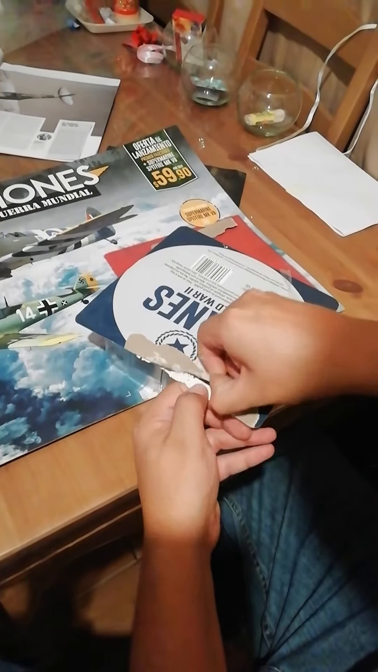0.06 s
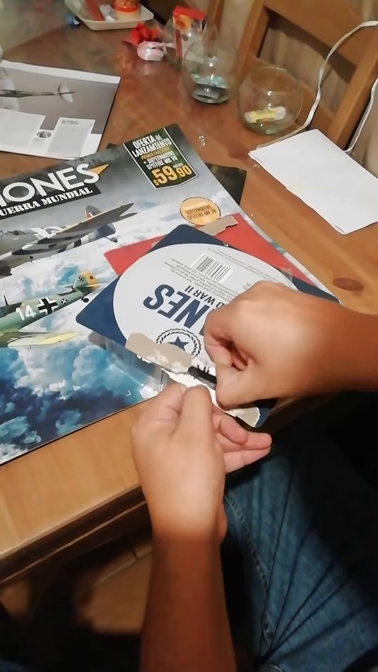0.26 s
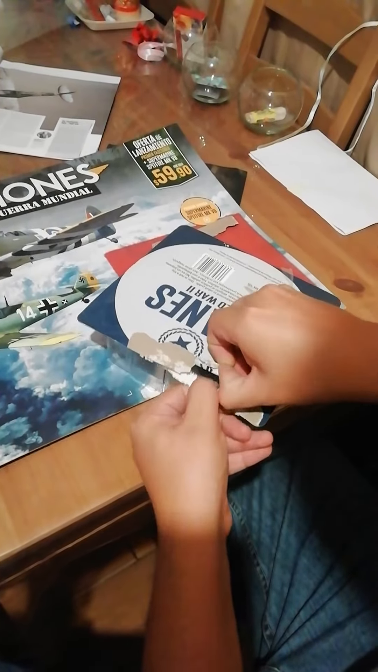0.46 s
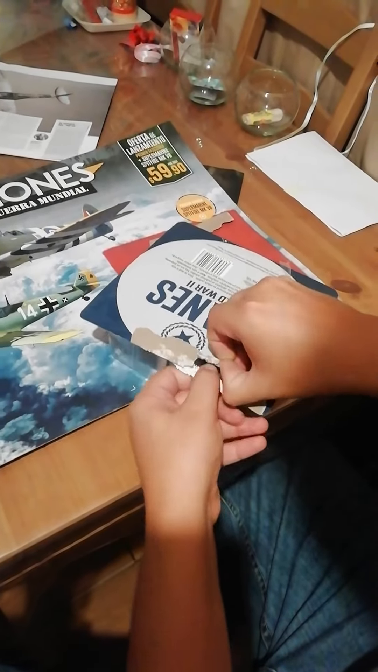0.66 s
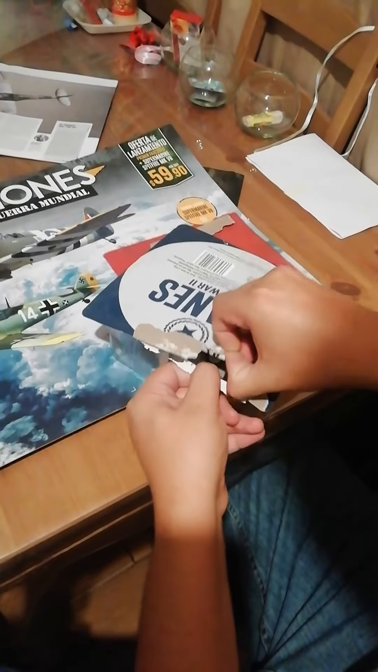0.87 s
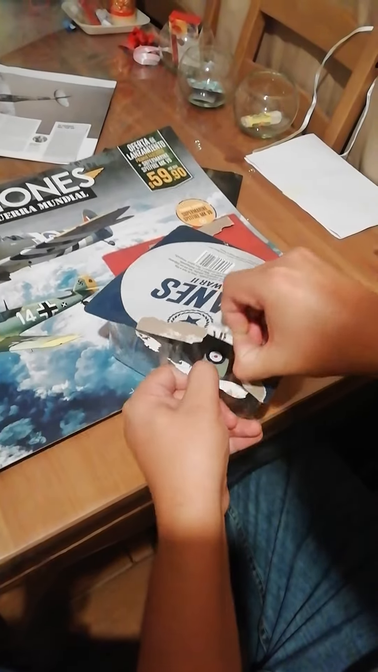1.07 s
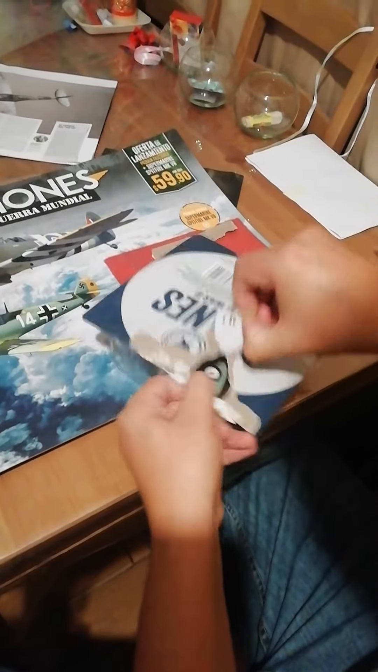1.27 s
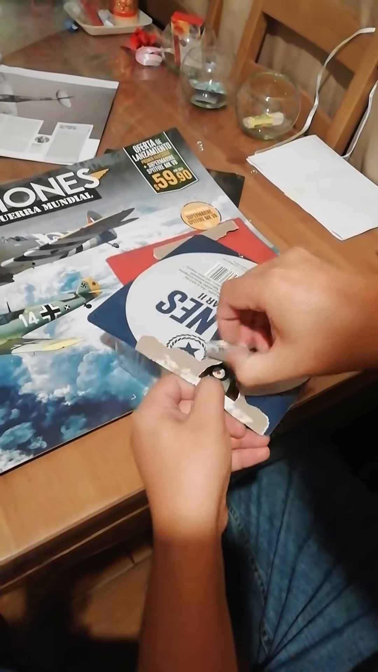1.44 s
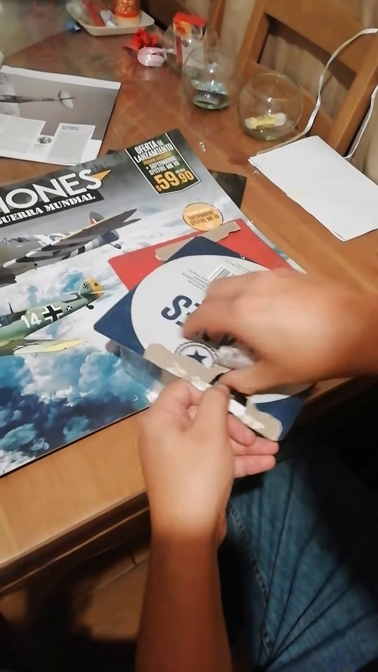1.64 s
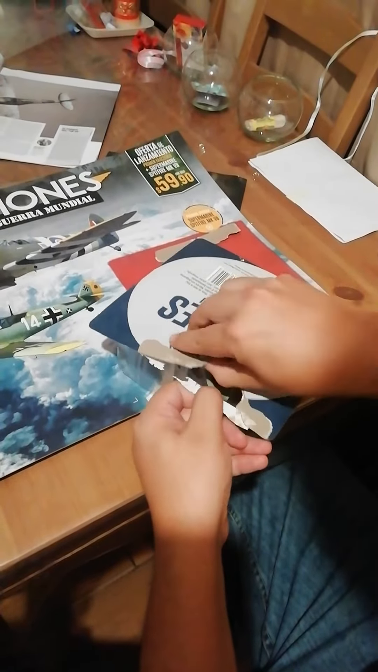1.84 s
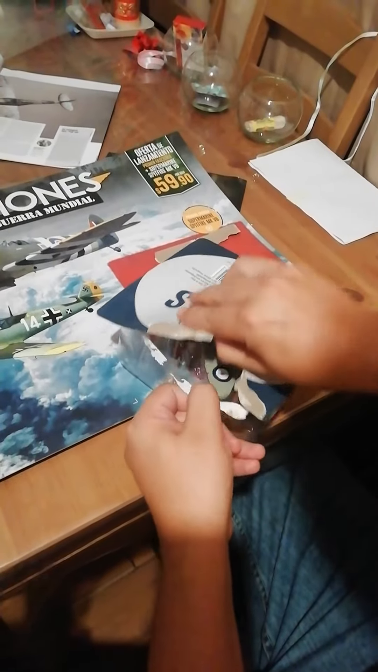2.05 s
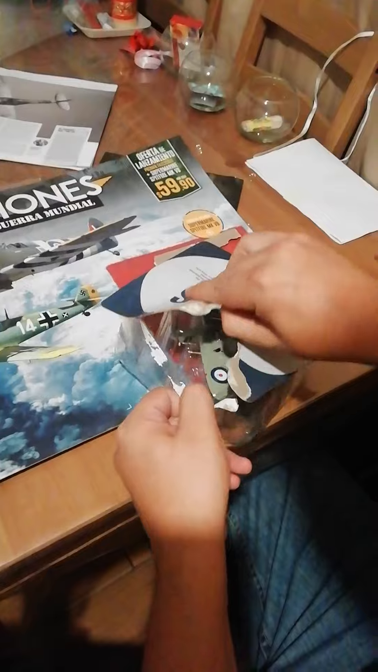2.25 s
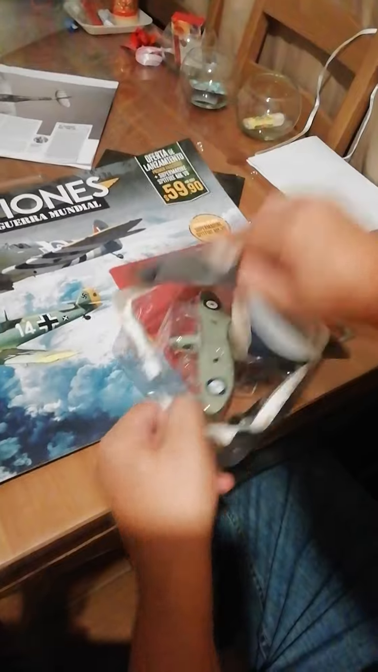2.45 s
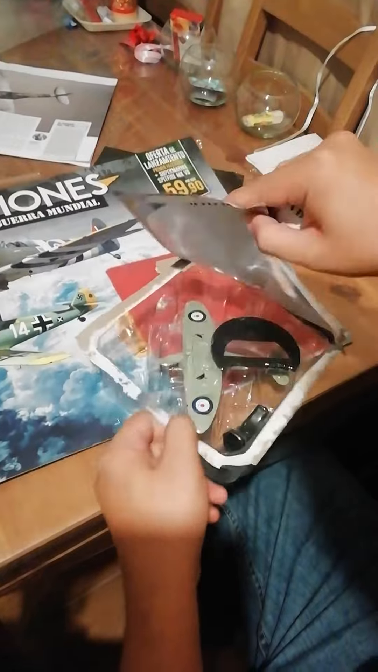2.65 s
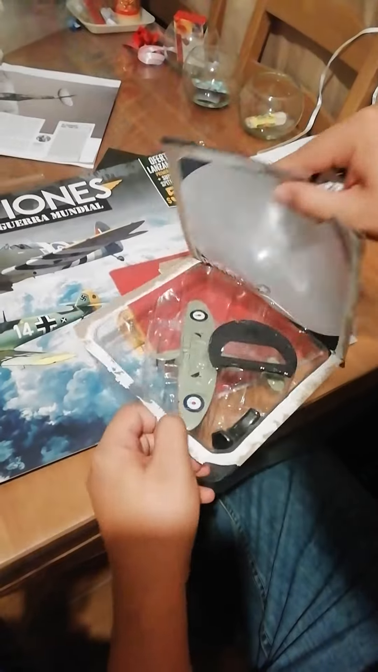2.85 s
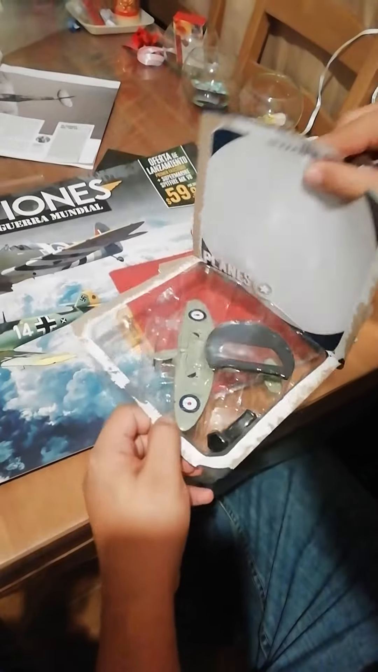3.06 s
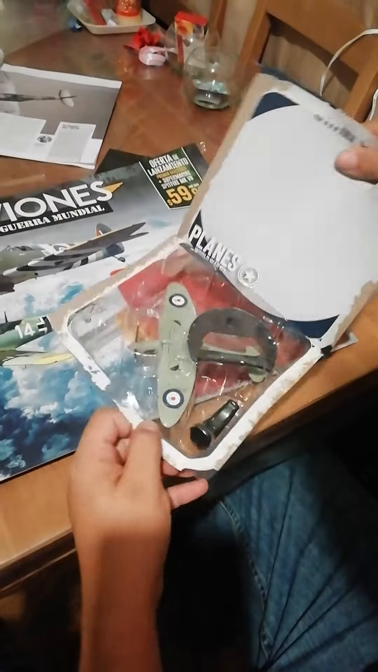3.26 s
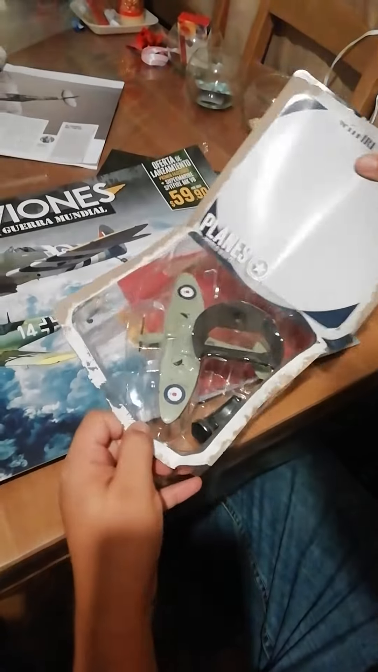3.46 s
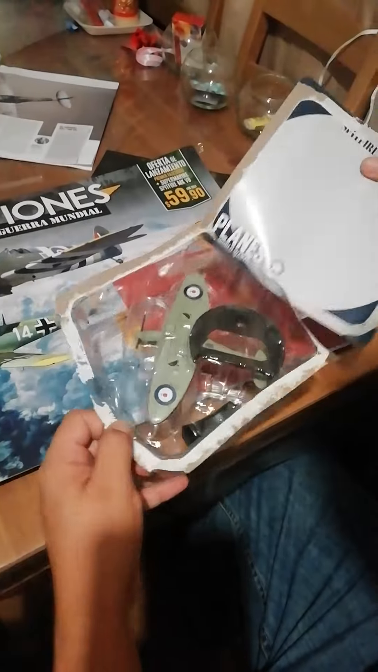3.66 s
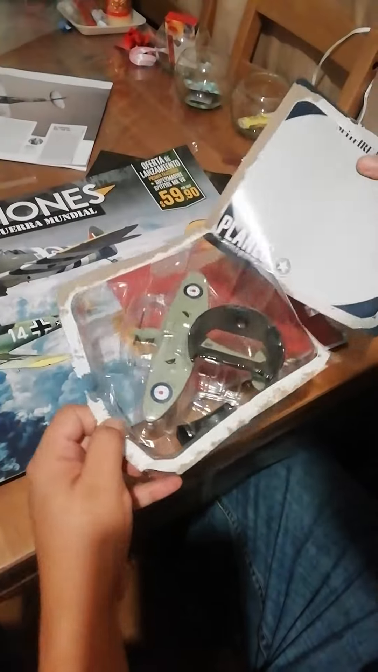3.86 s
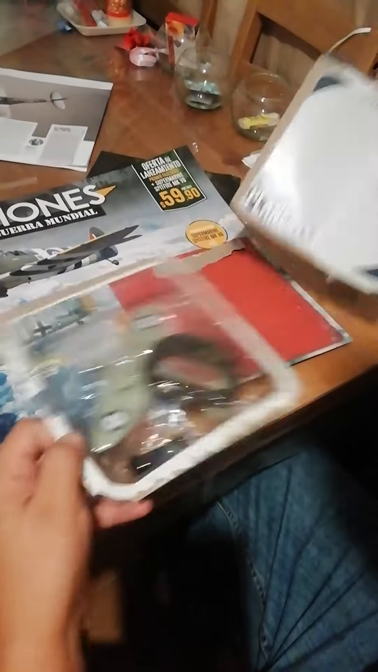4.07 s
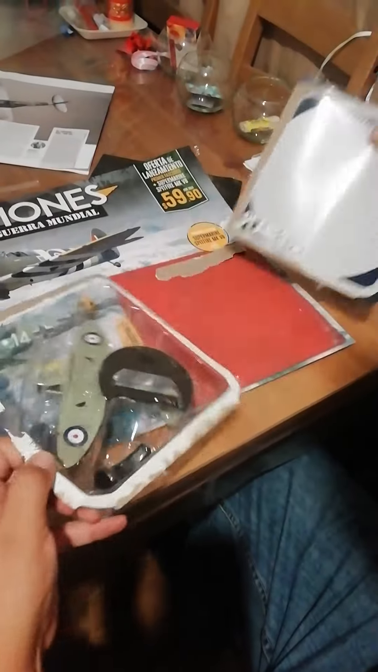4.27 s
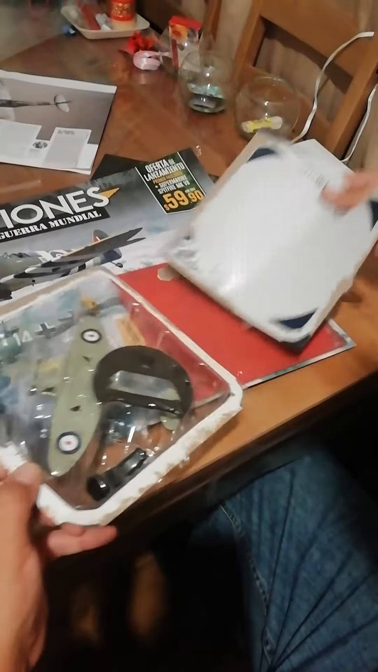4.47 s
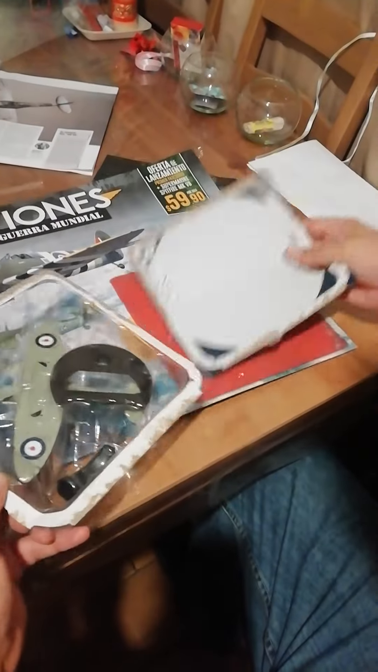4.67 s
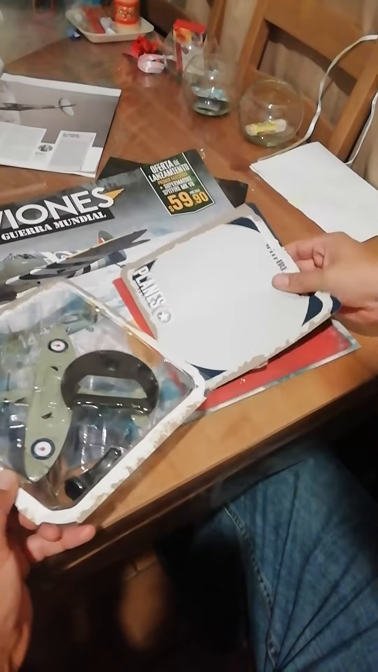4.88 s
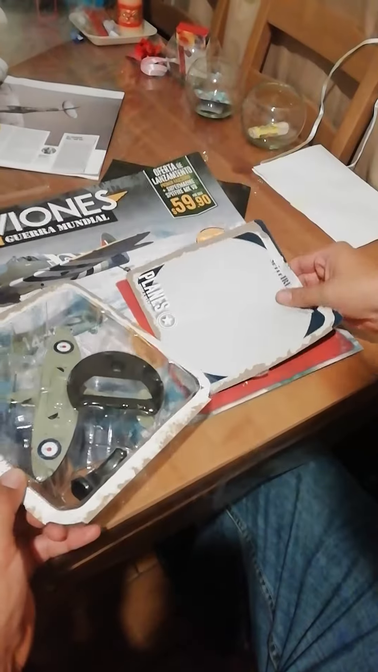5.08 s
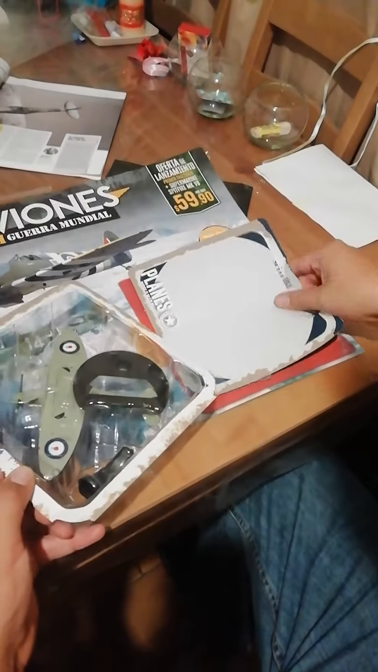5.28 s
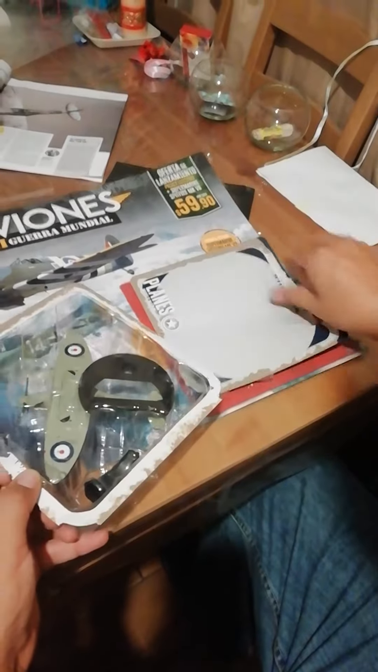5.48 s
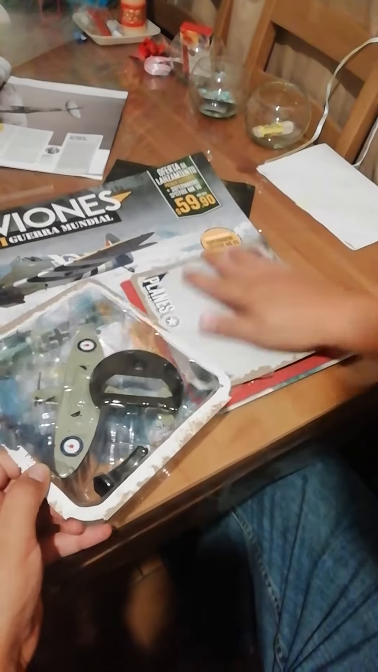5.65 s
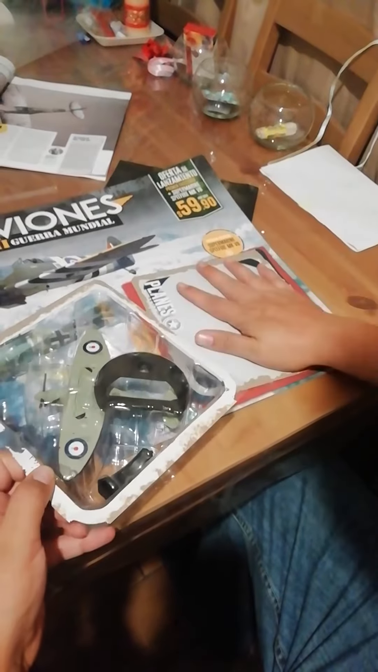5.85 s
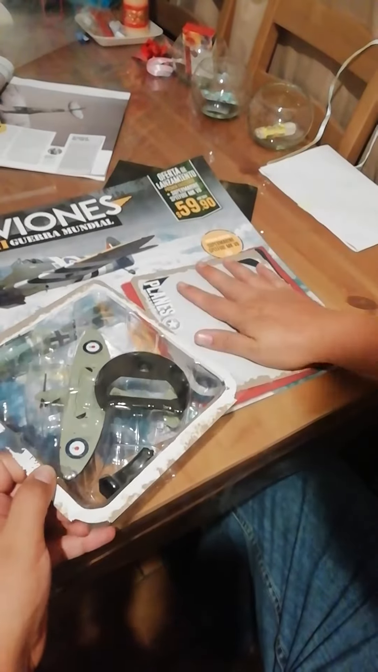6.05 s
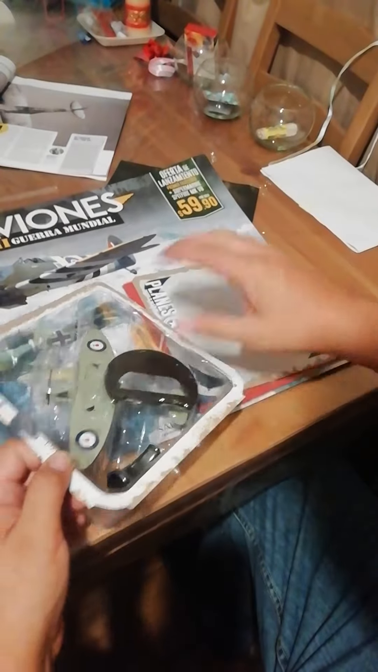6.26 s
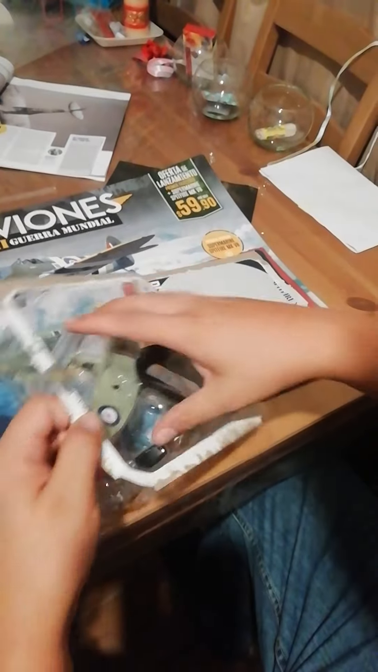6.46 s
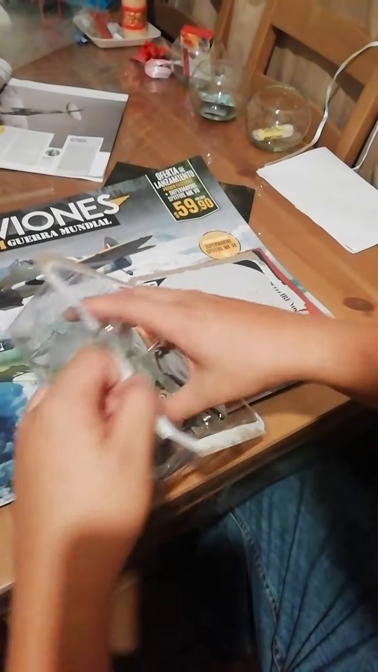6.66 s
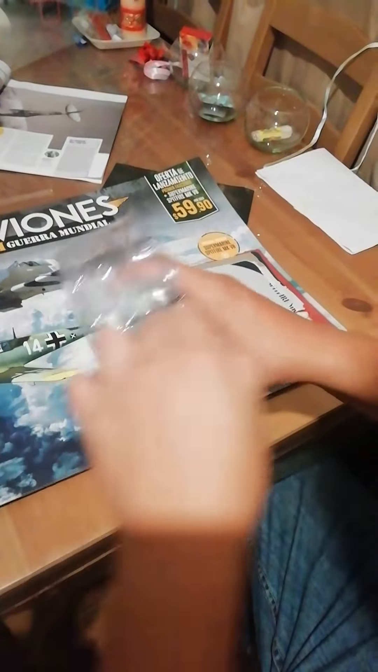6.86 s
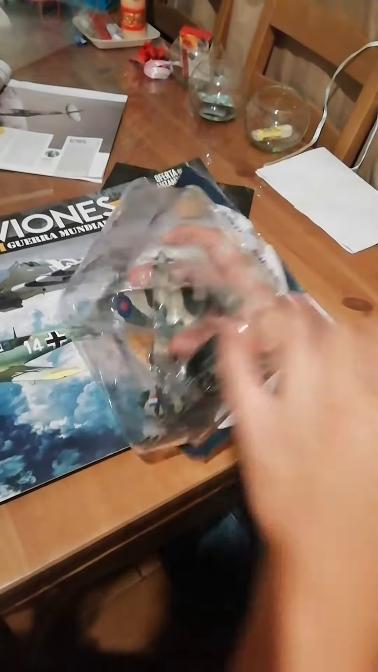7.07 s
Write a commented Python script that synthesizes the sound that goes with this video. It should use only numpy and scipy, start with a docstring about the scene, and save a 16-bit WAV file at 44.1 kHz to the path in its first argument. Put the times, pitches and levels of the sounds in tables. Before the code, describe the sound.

A small furnished room with faint low hum and quiet air, heard through close stereo phone microphones. A tiny finger squeak starts at once, then light plastic snaps from 0.14 s. Ticks stay sparse until a hard crack near 0.97 s, with more at 1.1 to 1.35 s, a short glue rip and low card thumps. A lull with a faint slide follows until 1.9 s. Snaps thicken from 2.0 s; between 2.3 and 2.7 s come strong cracks, gritty tearing and the heaviest card thump. Crackling continues from 2.8 s, growing sharpest and loudest from 3.35 to 4.2 s, with hollow pops and rips. It then drops abruptly: small clicks near 4.5 s, a few at 5.0 to 5.25 s, a clear brushing slide at 5.4 s, clicks around 5.7 s. A brighter snap at 6.17 s leads to light ticks, near quiet, then a small crackle at 6.95 s.

```python
"""Over a low hum, room air and a faint rustle of fingers, a squeak comes at once, then the first snaps of
stiff plastic. Hands pry a blister off its card on a table, lay the card down and turn the blister over.
Buckles are noise bursts through resonances of crack, shell and card; tearing glue and fibres are dense
random clicks. The flexing card thumps in decaying low sines. A small furnished room answers with decaying
noise tails; a phone with two microphones listens from close by."""
import sys
import numpy as np
from scipy import signal
from scipy.fft import rfft, irfft, next_fast_len
from scipy.io import wavfile
from scipy.ndimage import map_coordinates

SR = 44100
rng = np.random.default_rng(int(sys.argv[2]) if len(sys.argv) > 2 else 0)


def file_out(sig):
    """Save sig as 16-bit WAV at sys.argv[1]."""
    # one column per channel
    cols = np.atleast_2d(sig).T
    # limit, then scale
    lim = np.clip(cols, -1, 1)
    pcm = np.round(lim * 32767).astype(np.int16)
    wavfile.write(sys.argv[1], SR, pcm)


N = 313992

# Room tone spectrum: (frequency [Hz], relative density [dB per Hz])
AIR_SPECTRUM = [(12, -20), (20, -3.5), (65, -14.5), (131, -7.5), (164, -8), (243, -8), (360, -22),
                (649, -21.5), (859, -37.5), (935, -48), (1460, -30), (1940, -31.5), (4630, -37),
                (14600, -42), (16400, -85)]
# Partials of the appliance hum: (frequency [Hz], nominal rms level [dB])
HUM_PARTIALS = [(59.2, -56.5), (118.4, -62), (177.6, -71.5), (274.5, -72.5), (355.3, -74.5)]
# Correlation of the two microphones: (frequency [Hz], likeness [-1 to 1])
MICROPHONE_LIKENESS = [(30, 0.91), (60, 0.93), (130, 0.98), (290, 0.74), (600, -0.06), (1400, 0.14),
                       (3000, -0.07)]
# Difference in colour of the microphones: (frequency [Hz], left-right level [dB])
MICROPHONE_COLOUR = [(200, 0), (380, -3), (700, 1), (1300, -1), (2400, -3.5), (4400, -5), (8000, 4.5),
                     (12000, 10)]
# Reverberation of the room: (frequency [Hz], 60 dB decay time [s])
ROOM_DECAY = [(200, .45), (530, .33), (1400, .37), (3700, .34), (9700, .28)]
# The card flexes: (time [s], peak level [dB], frequency [Hz])
CARD_THUMPS = [(0.142, -42.5, 402), (0.927, -34, 279), (0.962, -25, 320), (1.22, -28.5, 115),
               (1.25, -28.5, 105), (1.361, -40, 115), (1.502, -42, 88.8), (1.903, -36.5, 95),
               (1.995, -29.5, 126), (2.16, -34.5, 263), (2.362, -35.5, 172), (2.475, -18.5, 277.5),
               (2.5, -27, 270), (2.526, -21.5, 119), (2.74, -34, 169), (2.968, -30.5, 122),
               (3.144, -29.5, 252), (3.268, -31, 353), (3.662, -30.5, 246), (3.694, -40.5, 320),
               (3.809, -31, 247), (4.056, -38.5, 323), (4.215, -33, 224), (4.279, -40, 126),
               (6.961, -40.5, 188)]
# A fingertip drags on the gloss: (start [s], end [s], level [dB], lower resonance [Hz], upper resonance [Hz])
FINGER_SQUEAKS = [(0.024, 0.145, -56.5, 1810, 4400), (5.457, 5.708, -75, 3920, 4710)]
# Fingers shift on plastic and card: (time [s], rustle level [dB], dull part re rustle [dB])
FINGER_RUSTLE = [(0, -59.5, -2), (.18, -54.5, -0.5), (.32, -80, 1), (.55, -57.5, -6), (.89, -60.5, -0.5),
                 (1.23, -38, 0), (1.55, -72.5, 3), (1.98, -61.5, 4.5), (2.56, -37, 3), (2.81, -49.5, -3.5),
                 (2.99, -68, 3), (3.4, -51.5, -5.5), (4.1, -36.5, -0.5), (4.26, -58, 4), (5.1, -69.5, -6.5),
                 (5.29, -51, -4), (5.45, -66, -3.5), (6.09, -76, 3), (6.31, -79, -2), (6.58, -73, 8.5),
                 (6.84, -70.5, 7), (7.12, -58, -3)]
# One surface slides on another: (middle time [s], length [s], hiss level [dB])
SURFACE_SLIDES = [(.64, 0.064, -62), (1.46, 0.043, -51.5), (1.72, 0.097, -48), (4.42, 0.011, -68),
                  (4.457, .012, -50), (4.67, 0.048, -49.5), (4.92, 0.063, -64), (5.378, 0.083, -37.5),
                  (5.775, 0.051, -45), (5.96, 0.016, -60.5), (6.13, 0.14, -63), (6.575, 0.055, -69.5),
                  (6.93, 0.065, -53)]
# Glue lets go: (middle time [s], length [s], crackle level [dB])
GLUE_RIPS = [(0.162, 0.042, -44.5), (0.96, 0.02, -38.5), (1.116, 0.011, -42), (1.201, 0.029, -26),
             (1.252, 0.04, -66), (2.131, 0.024, -27.5), (2.42, 0.026, -28), (2.498, 0.09, -20),
             (2.562, 0.084, -23.5), (3.708, 0.022, -22), (3.848, 0.044, -32.5), (3.992, 0.057, -33.5),
             (4.038, 0.12, -24.5), (6.233, 0.063, -47), (6.998, 0.11, -45.5)]
# Bright colour of tearing fibres: (frequency [Hz], gain [dB])
FIBRE_SPECTRUM = [(880, -30.5), (1500, 0.5), (1960, -6.5), (3140, 0.5), (7810, -4), (9540, -13),
                  (11000, -23.5), (15300, -29.5), (16400, -75)]
# Dull colour of tearing and rubbing: (frequency [Hz], gain [dB])
DULL_SPECTRUM = [(90, -33), (230, -6.5), (500, 0), (900, 2), (1500, 0), (2500, -16), (4500, -42)]
# Buckles: (time [s], crack level [dB], shell level re crack [dB], shell resonance [Hz], crack resonance [Hz])
BUCKLES = [(0.1416, -24.5, -17, 1760, 5220), (0.1595, -24, -10.5, 707, 4370),
           (0.2764, -28.5, -6.5, 1080, 3680), (0.332, -46, 2.5, 900, 4870), (0.5013, -37, -7, 1070, 5130),
           (0.5853, -34.5, 4, 1214, 2930), (0.7405, -37.5, -9.5, 1420, 5320),
           (0.8471, -31.5, -21, 1120, 5320), (0.8814, -26, -21, 1460, 3710), (0.9193, -36.5, -1, 680, 3100),
           (0.9671, -5.5, -7.5, 1250, 3960), (1.1215, -17, -11, 1650, 3450),
           (1.1625, -13.5, -6.5, 1780, 5000), (1.223, -7.5, -9.5, 864, 3030),
           (1.3449, -16.5, -9.5, 1256, 4430), (1.501, -36, -17, 1450, 4110), (1.6627, -40, -11, 937, 4170),
           (1.9377, -33.5, -1, 1620, 2710), (1.9725, -25.5, -5.5, 1670, 4080),
           (1.9991, -28, -8.5, 1220, 3460), (2.0729, -17.5, -4.5, 2360, 4070), (2.0984, -20, 9, 1266, 2880),
           (2.1229, -18, -8.5, 1650, 2760), (2.1296, -28, -15, 1520, 4160),
           (2.2002, -25.5, -10, 1340, 4310), (2.2337, -25.5, -19, 1240, 3370),
           (2.2781, -26, 4.5, 1570, 2800), (2.3286, -9, -9.5, 1630, 5070),
           (2.3875, -11.5, -7.5, 1607, 3050), (2.4244, -24.5, -23, 1470, 5590),
           (2.4704, -16.5, -21, 1250, 4390), (2.5093, -22, -21.5, 1600, 3180),
           (2.5682, -8.5, 1, 1360, 2530), (2.6678, -5, -8, 1464, 4020), (2.7964, -47.5, -31, 1240, 4010),
           (2.8225, -23, -8.5, 2110, 3930), (2.9169, -14, -16, 2190, 5380), (2.9297, -17, 0, 1375, 4360),
           (2.9741, -15.5, -2.5, 1234, 3900), (2.9827, -26, 8.5, 808, 4060), (3.1489, -45, 10.5, 790, 3790),
           (3.1943, -16.5, 0, 900, 2870), (3.255, -25, 3, 1160, 3110), (3.2773, -17, 1.5, 1293, 2540),
           (3.3635, -10.5, 0, 843, 3920), (3.3809, -7, -5, 998, 4580), (3.466, -11, -8.5, 2100, 4490),
           (3.473, -1, -8.5, 885, 4270), (3.6359, -19, -5, 1720, 4010), (3.664, -8, -7, 2315, 4220),
           (3.6672, -5.5, -1.5, 1810, 3110), (3.7002, -16, 5.5, 785, 4550), (3.8105, -18.5, 0.5, 730, 5490),
           (3.8135, -2, -6, 787, 5700), (3.9744, -19, -12.5, 875, 5400), (3.9993, -2.5, -5.5, 1850, 3640),
           (4.0663, -13, -0.5, 1080, 2790), (4.0735, -15.5, -29.5, 2060, 2820),
           (4.1623, -8, 1.5, 1454, 2980), (4.1688, -1.5, -13.5, 2464, 3980),
           (4.4908, -31, -10.5, 1100, 4130), (4.5045, -22, -6.5, 1090, 4410),
           (4.6126, -30.5, -3.5, 2100, 2680), (5.0295, -38, -0.5, 2390, 2800),
           (5.1244, -20, -13.5, 1490, 4880), (5.1728, -20.5, -3.5, 1740, 3420),
           (5.2288, -16, -12, 1600, 5650), (5.7085, -21, -11.5, 1424, 4070),
           (5.7493, -31.5, -6, 1586, 2680), (6.1738, -14.5, -12, 1400, 5300),
           (6.25, -31.5, -11, 1510, 4700), (6.3047, -23.5, -1.5, 1486, 2780), (6.331, -21, -9, 1550, 4340),
           (6.3418, -25, -3.5, 1640, 5640), (6.559, -49.5, 12, 920, 3360), (6.6047, -44.5, 9, 790, 2730),
           (6.662, -48, -1, 1410, 4020), (6.765, -34, -5, 1456, 2680), (6.9424, -33.5, 9, 2280, 3230),
           (6.9527, -18.5, -0.5, 1410, 4170)]
# Colour of the crack: (frequency [Hz], gain [dB])
CRACK_SPECTRUM = [(1400, -52), (2500, -6.5), (3400, -5.5), (4500, -5.5), (6000, -10), (9000, -32.5),
                  (16400, -107)]
# Colour of the sizzle: (frequency [Hz], gain [dB])
SIZZLE_SPECTRUM = [(3000, -31.5), (6000, 4), (7500, 2), (9000, -5), (10500, -17), (14800, -40.5),
                   (16400, -60)]
# Sizzle of the buckles: (time [s], level re crack [dB])
SIZZLE_LEVEL = [(0, -8), (.9, -3.5), (1.6, -10), (2.6, -6.5), (3.4, -6), (4.2, -4.5), (4.6, -4.5),
                (5.7, -5), (7.12, -7.5)]
# Knock of the card under the buckles: (time [s], level [dB])
CARD_KNOCK = [(0, -22.5), (1.2, -16.5), (2, -15.5), (3, -23.5), (3.7, -27), (4.2, -22.5), (4.6, -34),
              (7.12, -35)]
# Where the snaps come from: (time [s], left-right level [dB])
SNAP_PLACE = [(0, -3.5), (1.5, -3), (2.9, -2.5), (3.6, 3), (4.3, 1), (5.1, -1.5), (6.198, 0), (7.12, -2.5)]

TOP_HZ = 16450
THUMP_T60_S = 0.14
RIP_DULL_DB, SLIDE_DULL_DB = -4, -18.5  # dull part re bright part
SIZZLE_FADES = 0.35  # dB lost for each dB of shell re crack: dull snaps sizzle less
CARD_FOLLOWS = 0.55  # dB that the knock gains for each dB of shell level
POP_DB = -6.5  # re shell
SCATTER_DB = 3.5  # standard deviation of sizzle and knock
CRACK_FLOOR = 0.6  # high-pass edge as a share of the crack resonance


def amp(db):
    """Decibel law: the amplitude gain of a level in dB."""
    return 10 ** (np.asarray(db) / 20)


def unit(x):
    """Normalisation of power: x at rms 1."""
    return x / np.sqrt(np.mean(x ** 2) + 1e-20)


def peaked(x, db):
    """Normalisation of amplitude: x with its peak at db."""
    return x * amp(db) / (np.abs(x).max() + 1e-12)


def along(points, hz):
    """Interpolation of (Hz, value) points on a logarithmic frequency axis."""
    f, v = np.transpose(points)
    return np.interp(np.log(hz + 1), np.log(f + 1), v)


def over_time(points, t):
    """Linear interpolation of (s, value) points."""
    return np.interp(t, *np.transpose(points))


def wobble(rate):
    """Slow random modulation: a smooth curve with rate knots a second."""
    knots = rng.standard_normal(int(N * rate / SR) + 4)
    return map_coordinates(knots, [np.arange(N) * rate / SR])


def filtered(x, response):
    """Linear filtering: the spectrum of x times a response of frequency."""
    m = next_fast_len(x.shape[-1] + 8192)
    return irfft(rfft(x, m) * response(np.fft.rfftfreq(m, 1 / SR)), m)[..., :x.shape[-1]]


def coloured(x, spectrum):
    """Minimum-phase filtering: folding the cepstrum makes the (Hz, dB) gain causal."""
    size = 2048
    cepstrum = irfft(np.log(amp(along(spectrum, np.fft.rfftfreq(size, 1 / SR))) + 1e-6))
    cepstrum[1:size // 2] *= 2
    cepstrum[size // 2 + 1:] = 0
    taps = irfft(np.exp(rfft(cepstrum)))[:size // 4]
    return signal.fftconvolve(np.atleast_2d(x), taps[None], axes=1)[:, :x.shape[-1]].reshape(x.shape)


def microphones(pair):
    """Spatial coherence: mixing two unrelated signals makes left and right alike in the bass only."""
    def turn(hz):
        return np.arccos(np.clip(along(MICROPHONE_LIKENESS, hz), -1, 1)) / 2
    mid, side = filtered(pair, lambda hz: np.array([np.cos(turn(hz)), np.sin(turn(hz))]))
    return np.array([mid + side, mid - side])


def appliance():
    """Periodic vibration over diffuse noise: motor partials waver in level and phase above the room tone."""
    t = np.arange(N) / SR
    hum = np.zeros(N)
    for hz, db in HUM_PARTIALS:
        level = np.sqrt(2) * amp(db + 2.2 * wobble(6.5))
        hum += level * np.sin(2 * np.pi * hz * t + 0.12 * wobble(4.6))
    air = filtered(rng.standard_normal((2, N)), lambda hz: amp(along(AIR_SPECTRUM, hz)))
    return hum + amp(-60.5 + 1.1 * wobble(6.6)) * unit(microphones(air))


def room(sources):
    """Reverberation: noise tails die exponentially at a rate set by frequency, one for each source signal."""
    hz, t, z = signal.stft(rng.standard_normal((len(sources), 2, SR // 2)), SR, nperseg=256)
    decay = amp(-60 * t / along(ROOM_DECAY, hz)[:, None])
    tails = signal.istft(z * decay, SR, nperseg=256)[1]
    wet = 0
    for x, tail in zip(sources, tails):
        wet = wet + signal.fftconvolve(x[None], microphones(tail / np.linalg.norm(tail[0])), axes=1)
    return np.pad(wet, ((0, 0), (200, 0)))[:, :N]  # samples of delay to the first walls


def thumps():
    """Damped plate flexure: the card pushes air in short, uneven low swings, equal at both microphones."""
    out, t = np.zeros(N + SR), np.arange(SR // 3) / SR
    envelope = amp(-60 * t / THUMP_T60_S) * (1 - np.exp(-t / 0.0016))
    for s, db, hz in CARD_THUMPS:
        band = signal.butter(1, [hz * .7, hz * 1.3], "band", fs=SR, output="sos")
        unevenness = unit(signal.sosfilt(band, rng.standard_normal(len(t))))
        swing = np.sin(2 * np.pi * hz * t) + 0.71 * unevenness
        out[round(s * SR):][:len(t)] += peaked(swing * envelope, db)
    return out[:N]


def squeaks():
    """Stick-slip friction: unevenly modulated noise through two resonances."""
    t, out = np.arange(N) / SR, 0
    for start, end, db, low_hz, high_hz in FINGER_SQUEAKS:
        gate = np.clip(np.minimum(t - start, end - t) / 0.003, 0, 1)
        stroke = gate * amp(3.5 * wobble(67))

        def bands(f):
            return sum(low_hz / hz / (1 + ((f / hz - 1) / 0.06) ** 2) for hz in (low_hz, high_hz))
        out = out + amp(db) * stroke * unit(filtered(rng.standard_normal((2, N)), bands))
    return out


def strokes(rows, dull_db):
    """Amplitude envelope: each stroke swells and fades once; returns gains of bright and dull parts."""
    swell = np.zeros(N + SR)
    for s, length, db in rows:
        shape = np.sin(np.linspace(0, np.pi, round(length * SR)))
        swell[round((s - length / 2) * SR):][:len(shape)] += amp(db) * shape
    return swell[:N] * amp([[0], [dull_db]])


def crackle(level, dull, density, unequal_db, smooth):
    """Random fracture: clumps of unequal clicks, each about a millisecond, on a fine hiss."""
    fires = rng.random(N) < density * amp(5 * wobble(70))  # chance per sample
    sizes = fires * amp(unequal_db * np.minimum(rng.exponential(size=N), 4))
    click_power = signal.lfilter([1], [1, -.96], sizes ** 2)
    spread = unit(click_power ** .5) + smooth
    grit = spread * rng.standard_normal((2, 2, N))
    bright_part = unit(coloured(grit[0], FIBRE_SPECTRUM)) * level
    dull_part = unit(coloured(grit[1], DULL_SPECTRUM)) * dull
    return microphones(bright_part + dull_part)


def tearing():
    """Fracture and friction: rips crackle coarsely; slides and finger rustle are finer."""
    t = np.arange(N) / SR
    s, db, dull_db = np.transpose(FINGER_RUSTLE)
    fingers = amp([np.interp(t, s, db), np.interp(t, s, db + dull_db)])
    rubbing = fingers + strokes(SURFACE_SLIDES, SLIDE_DULL_DB)
    fine = crackle(*rubbing, density=.015, unequal_db=3.2, smooth=.5)
    coarse = crackle(*strokes(GLUE_RIPS, RIP_DULL_DB), density=.02, unequal_db=3.4, smooth=.25)
    return coarse + fine + squeaks()


def shell_body(hz):
    """Shell resonance: a filter that adds one mode to a broad band."""
    band = signal.butter(2, [650, 2700], "band", fs=SR, output="sos")
    mode = signal.iirpeak(hz, 8, SR)
    return lambda x: signal.sosfilt(band, x + 0.87 * signal.lfilter(*mode, x))


def crack_body(hz):
    """Crack resonance: a filter with one broad mode, little below it, and the colour of a crack."""
    mode = signal.iirpeak(hz, 4.5, SR)
    edge = signal.butter(2, CRACK_FLOOR * hz, "high", fs=SR)
    return lambda x: coloured(signal.lfilter(*edge, x + 1.4 * signal.lfilter(*mode, x)), CRACK_SPECTRUM)


def snaps():
    """Buckling instability: milliseconds of tiny fractures crack, shake the shell and knock the card.
    Returns the sound near the microphones, and that sent around the room: equal energy, evenly spread."""
    near, around, t = np.zeros((2, N + SR)), np.zeros((3, N + SR)), np.arange(SR // 16) / SR
    card_band = signal.butter(2, [200, 750], "band", fs=SR, output="sos")
    impulse = signal.unit_impulse(len(t))

    def sizzle(x):
        return coloured(x, SIZZLE_SPECTRUM)

    def card(x):
        return signal.sosfilt(card_band, x)

    for k, (s, db, shell_re_crack_db, hz, crack_hz) in enumerate(BUCKLES):
        chance_db = SCATTER_DB * rng.standard_normal(2)
        shell_db = db + shell_re_crack_db
        sizzle_db = db + over_time(SIZZLE_LEVEL, s) - SIZZLE_FADES * shell_re_crack_db + chance_db[0]
        card_db = over_time(CARD_KNOCK, s) + CARD_FOLLOWS * shell_db + chance_db[1]

        t60 = .0045 + .013 * amp(db) ** .4  # a bigger buckle takes longer to break
        rattle = amp(-24 - 60 * t / .05)
        burst = (1 - np.exp(-t / .0004)) ** 2 * (amp(-60 * t / t60) + rattle)

        # The hollow shell pops briefly at its resonance.
        pop = np.sin(2 * np.pi * (hz * t + rng.random((2, 1))))
        pop = pop * (1 - np.exp(-t / 0.00075)) * amp(-60 * t / 0.057)
        pair = pop * amp(shell_db + POP_DB)

        at = round(s * SR)
        # (body, exponent of the burst, peak level [dB]): heavier parts decay more slowly
        parts = [(crack_body(crack_hz), 1, db), (sizzle, 1, sizzle_db),
                 (shell_body(hz), .6, shell_db), (card, .3, card_db)]
        for body, haste, peak_db in parts:
            sound = peaked(body(burst ** haste * rng.standard_normal((2, len(t)))), peak_db)
            # buckles take turns among three source signals of the room
            around[k % 3, at:at + len(t)] += unit(body(impulse)) * np.std(sound)
            pair = pair + sound
        near[:, at:at + len(t)] += pair
    pan_db = over_time(SNAP_PLACE, np.arange(N) / SR)
    return microphones(near[:, :N]) * amp(pan_db * [[.5], [-.5]]), around[:, :N]


def scene():
    """Superposition: near sounds and their reverberation in the microphones' colour, thumps and background."""
    background = appliance()
    low_swings = thumps()
    rips = tearing()
    cracks, around = snaps()
    echo = amp(-2.5) * room(around) + amp(-6.5) * room(rips[:1])
    sound = cracks + rips + echo
    heard = filtered(sound, lambda hz: amp(along(MICROPHONE_COLOUR, hz) * [[.5], [-.5]]))
    return heard + low_swings + background


def record(dry):
    """Saturation and band limiting: the converter clips at full scale, then nothing above TOP_HZ is kept."""
    return filtered(np.clip(dry, -1, 1), lambda hz: hz < TOP_HZ)


dry = scene()
out = record(dry)
file_out(out)
```